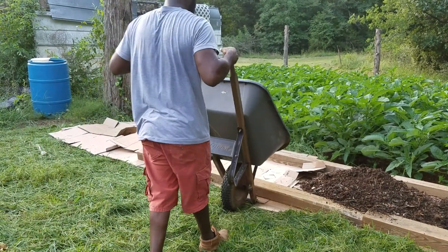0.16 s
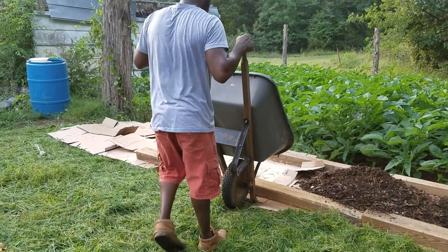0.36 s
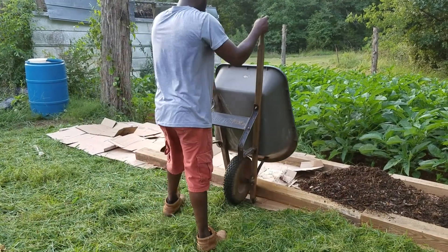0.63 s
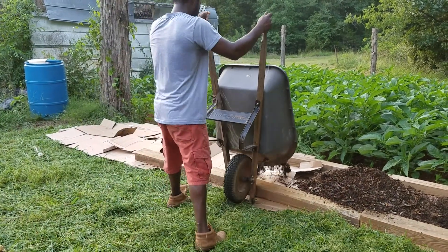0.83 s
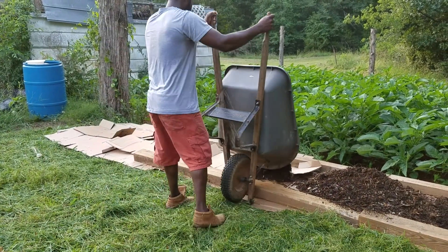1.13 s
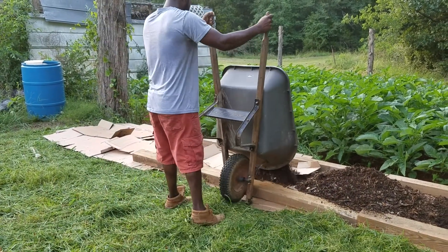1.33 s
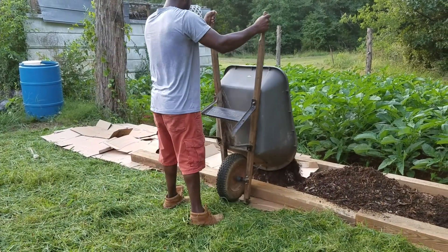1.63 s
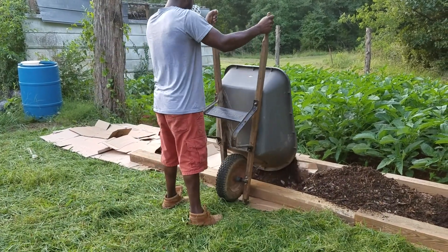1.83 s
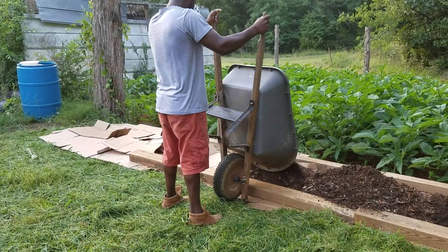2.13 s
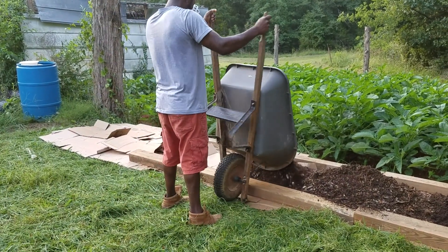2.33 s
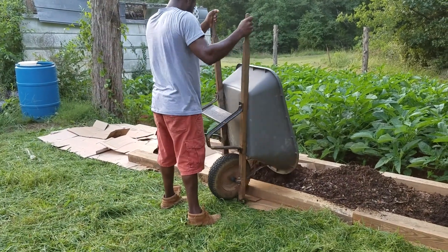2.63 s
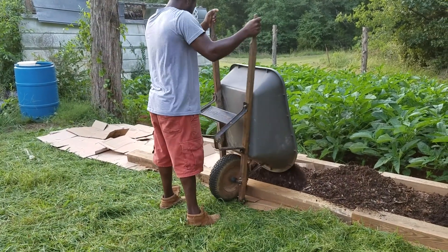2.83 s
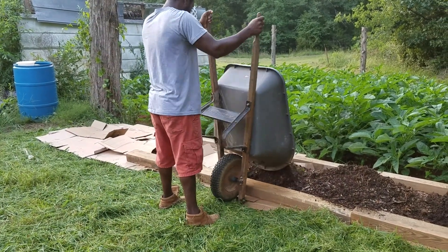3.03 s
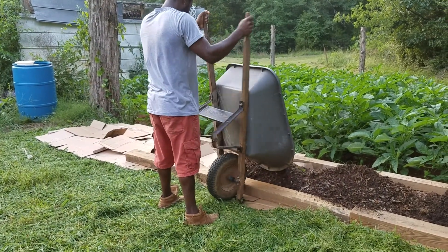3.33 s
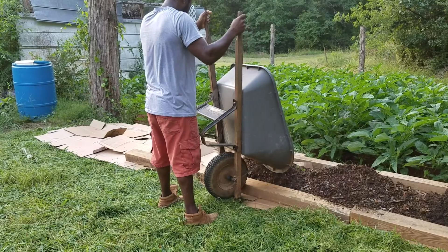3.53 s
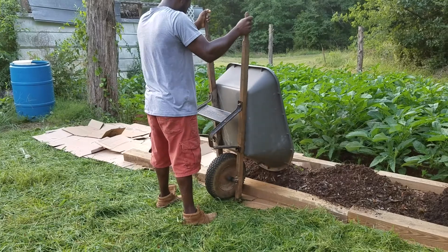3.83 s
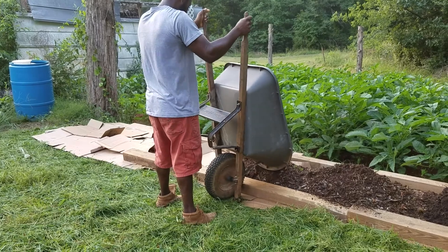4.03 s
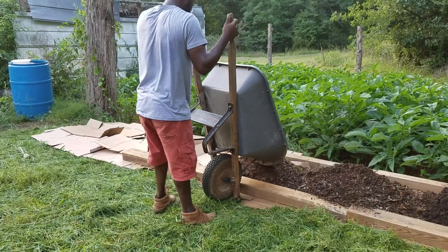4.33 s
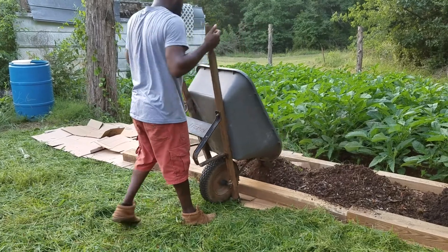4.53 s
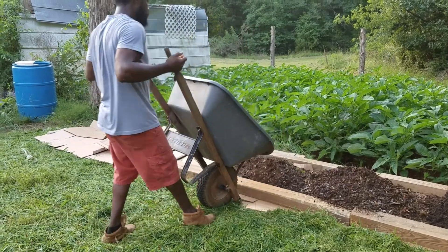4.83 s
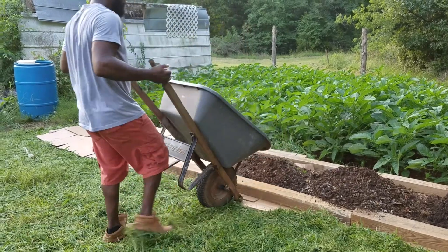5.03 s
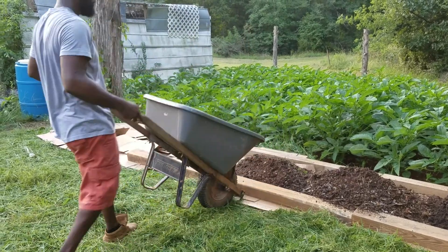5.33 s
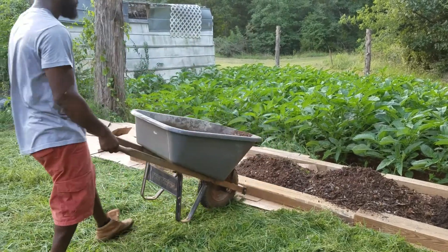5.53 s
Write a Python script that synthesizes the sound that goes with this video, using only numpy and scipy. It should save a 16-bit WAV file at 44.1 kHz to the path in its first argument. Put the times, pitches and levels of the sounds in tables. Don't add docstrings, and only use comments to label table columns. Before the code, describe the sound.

Outdoors, a steel barrow clatters, dumps sliding soil, knocks heavily against timber in uneven blows, then falls quiet to soft steps on grass.

```python
import sys
import numpy as np
from scipy import signal
from scipy.fft import rfft, irfft
from scipy.io import wavfile
from scipy.ndimage import uniform_filter1d

SR = 44100
rng = np.random.default_rng(int(sys.argv[2]) if len(sys.argv) > 2 else 0)


def natural_amplitude(level_db):
    exponent = np.asarray(level_db, float) / 20
    return 10 ** exponent


def master_out(mix):
    frames = np.transpose(np.atleast_2d(mix))
    ceiling = np.clip(frames, -1, 1)
    pcm = np.round(ceiling * 32767).astype(np.int16)
    wavfile.write(sys.argv[1], SR, pcm)


N = 250047

# (frequency [Hz], level [dB], decay by 60 dB [s])
PANEL_MODES = [(134, 0, 0.23), (191.5, -4, 0.11), (285.6, -1, 0.041), (348, -7.5, 0.1),
               (423.7, -5.5, 0.098), (450, -16.5, 0.19), (524.5, -7, 0.093), (682, -11, 0.04)]
# (frequency [Hz], level [dB], decay by 60 dB [s])
FRAME_MODES = [(1000, -13, 0.003), (1060, -8.5, 0.029), (1180, -5.5, 0.033), (1350, -11.5, 0.039),
               (1690, -3, 0.016), (1880, -5.5, 0.029), (2260, 3, 0.0062), (2470, -3, 0.0057),
               (2743, 1, 0.016), (3053, 5, 0.0074), (3500, -1, 0.01), (4290, -3, 0.019),
               (4570, -16, 0.0054)]

EARS = np.array([[1], [-1]])


def unit_rms(x):
    return x / np.sqrt(np.mean(x ** 2))


def band(x, lo_hz, hi_hz, order=2):
    return signal.sosfilt(signal.butter(order, [lo_hz, hi_hz], "band", fs=SR, output="sos"), x)


def walk(rate):
    k = int(SR / rate)
    held = np.repeat(rng.standard_normal(N // k + 1), k)
    return 2.54 * uniform_filter1d(uniform_filter1d(held, k), k)[:N]


def grains(per_s, spread_db):
    draw = rng.random((2, N))
    hit = draw[0] < per_s / SR
    u = 2 * draw[1][hit] - 1
    rarity = np.minimum(-np.log(np.abs(u) + 1e-9), 3)
    out = np.zeros(N)
    out[hit] = np.sign(u) * natural_amplitude(spread_db * rarity)
    return out


def wide(make, likeness):
    c = np.clip(likeness, 0, 1)
    return np.sqrt((1 + c) / 2) * make() + np.sqrt((1 - c) / 2) * make() * EARS


def treble(likeness, top_hz=12160):
    hiss = wide(lambda: np.diff(grains(5000, 2.1), n=2, prepend=[0, 0]), likeness)
    return unit_rms(band(hiss, 4600, top_hz))


def add(out, s, y):
    i = int(s * SR)
    out[..., i:i + y.shape[-1]] += y[..., :N - i]


def to_peak(y, db):
    return y / np.abs(y).max() * natural_amplitude(db)


def swells(table):
    t = np.arange(N) / SR
    return sum(natural_amplitude(db) * np.sin(np.pi * np.clip((t - s) / length, 0, 1)) ** .5 for s, length, db in table)


def ring(modes, scatter_db, click):
    hz, db, t60 = np.transpose(modes)[:, :, None]
    t = np.arange(int(SR * min(t60.max(), .12))) / SR
    chance = rng.standard_normal((4, len(modes), 1))
    phase = 2 * np.pi * hz * (1 + 0.031 * chance[0]) * t
    fade = natural_amplitude(db + scatter_db * chance[1] - 60 * t / t60) * np.sign(chance[2])
    skew = 0.16 * chance[3] * hz / 1000 * np.exp(-hz / 9000)
    both = np.cos(skew.T) @ (fade * np.sin(phase))
    apart = np.sin(skew.T) @ (fade * np.cos(phase))
    out = np.vstack([both + apart, both - apart])
    out[:, 0] += click
    return out


def strike(db, push, modes, click, lo_hz, hi_hz):
    y = signal.fftconvolve(ring(modes, 1.73, click), push[None])[:, :len(push)]
    y = signal.lfilter(*signal.butter(2, [lo_hz, hi_hz], "band", fs=SR), y)
    return to_peak(y, db)


def blows(table, grit_db, debris_db, debris_s, spread):
    # (frequency [Hz], level [dB], decay by 60 dB [s])
    grit_modes = [(5100, 11.5, 0.00089), (7580, -5, 0.0034), (9020, 5.5, 0.0064), (10900, -13, 0.0061)]
    out, t = np.zeros((2, N)), np.arange(SR // 8) / SR
    for s, db, grit, ms, hz in table:
        chance = rng.standard_normal((3, len(t)))
        lumps = np.minimum(uniform_filter1d(chance[2], size=60) * np.sqrt(60), 1.8)
        crumbs = natural_amplitude(debris_db + 6.0 * lumps) * np.exp(-t / debris_s)
        chatter = np.exp(-t / (abs(ms) / 1000 + 1e-4))
        contact = (chatter + crumbs) * (1 - np.exp(-t / 0.00017))
        touch = 3 * np.exp(-np.abs(t - .001) / .00008)
        lo_hz, hi_hz = max(hz / spread, 650), min(hz * spread, 5300)
        modes = FRAME_MODES + [(hz, 3, .016)]
        add(out, s, strike(db, touch + contact * chance[0], modes, 21.0, lo_hz, hi_hz))
        fine = strike(db + grit + grit_db, contact * chance[1], grit_modes, 8.7, 1800, 11000)
        add(out, s, fine * natural_amplitude(.9 * EARS))
    return out


def singing(hits, modes):
    out, t = np.zeros(N), np.arange(SR // 4) / SR
    for s, db in hits:
        lines = sum(natural_amplitude(g - 60 * t / t60) * np.sin(2 * np.pi * hz * t) for hz, g, t60 in modes)
        add(out, s, natural_amplitude(db) * lines)
    return out


def cicadas():
    # (frequency [Hz], width [Hz], rms level [dB], clicks [1/s], left minus right [dB],
    # left-right likeness [0-1])
    choirs = [
        (6630, 440, -56, 650, -4.5, 0),
        (7280, 1300, -57, 1300, 4, 0.8),
        (9430, 810, -59.5, 1300, -6.5, 1),
    ]
    out = 0
    for hz, width, db, per_s, pan_db, likeness in choirs:
        lo_hz, hi_hz = hz - width / 2, hz + width / 2
        choir = wide(lambda: unit_rms(band(grains(per_s, 0.28), lo_hz, hi_hz, order=3)), likeness)
        out = out + choir * natural_amplitude(db + .5 * walk(1.47) + 0.45 * walk(40) + pan_db * .5 * EARS)
    return out


def air():
    # (frequency [Hz], level [dB per Hz])
    hum_spectrum = [(24, -51), (40, -10), (80, -7.5), (156, -54), (238, -7.5), (410, -2.5), (836, -16),
                    (1440, -15), (1980, -17.5), (2390, -17.5), (6000, -18.5), (7800, -50), (13200, -120)]
    # (time [s], level [dB])
    breeze = [
        (0, 0),
        (4.3, -0.5),
        (5.35, 0),
        (5.55, -4),
    ]
    hum_db, hiss_db = -60, -65
    out, swell, (at, db) = 0, walk(0.64), np.transpose(hum_spectrum)
    breeze_db = np.interp(np.arange(N) / SR, *np.transpose(breeze))
    for hz in 45 * 2 ** np.arange(0, 7.5, .5):
        hum = wide(lambda: band(rng.standard_normal(N), hz / 2 ** 0.15, hz * 2 ** 0.27), .95 - hz / 4500)
        level_db = np.interp(np.log(hz), np.log(at), db)
        out = out + hum * natural_amplitude(level_db + .5 * swell + walk(20.54) + breeze_db * (hz < 1200))
    flicker_db = 0.5 * walk(5) + 0.8 * walk(30)
    return unit_rms(out) * natural_amplitude(hum_db) + treble(0.69, 15300) * natural_amplitude(hiss_db + flicker_db)


def load():
    # (time [s], jolting level [dB], flow level [dB])
    motion = [(0.07, -75, -63.5), (0.16, -64, -56.5), (0.45, -59, -50), (0.66, -61, -51.5),
              (0.84, -50.5, -44.5), (1.05, -49.5, -46.5), (1.2, -52.5, -54), (1.74, -47, -51.5),
              (2.2, -46, -53), (2.46, -54, -59), (2.68, -41, -51.5), (2.84, -52.5, -58), (3.13, -48, -53),
              (3.9, -45.5, -50.5), (4.07, -67, -62.5), (4.6, -85, -74), (5.2, -86, -66), (5.67, -88, -77)]
    t = np.arange(N) / SR
    s, *columns = np.transpose(motion)
    jolt_db, flow_db = (np.interp(t, s, c) for c in columns)
    boom_db = -49 + 0.74 * (jolt_db + 50.5)
    dust_db = -51 + 0.53 * (flow_db + 47) - 0.5 * t

    def tumble(modes, per_s, spread_db, click, lo_hz, hi_hz):
        out = 0
        for _ in range(5):
            response = ring(modes, 0.92, click)
            out = out + signal.oaconvolve(response, grains(per_s, spread_db)[None], axes=1)[:, :N]
        return unit_rms(band(out, lo_hz, hi_hz, order=3))

    rumble = unit_rms(band(rng.standard_normal(N), 38.0, 183, order=3))
    rumble = rumble * natural_amplitude(jolt_db - 4.5) * natural_amplitude(1.1 * walk(13.0))
    boom = tumble(PANEL_MODES, 150, 3.0, 36.0, 181.0, 860) * natural_amplitude(boom_db + 1.2 * walk(34))
    damp = [(hz, db - 10 * np.log10(1 + (hz / 1300) ** 2), t60) for hz, db, t60 in FRAME_MODES[:-1]]
    scrape = tumble(damp, 2200, 9.0, 7.0, 520, 5600) * natural_amplitude(flow_db + 1.4 * walk(70))
    dust = treble(.6) * natural_amplitude(dust_db + 1.0 * walk(66) + 0.26 * walk(10.2))
    return rumble + boom + scrape + dust


def ticks():
    # (time [s], peak level [dB], centre frequency [Hz])
    snaps = [(0.0294, -42, 12000), (0.0538, -43, 14200), (0.0867, -33, 15400), (0.1244, -40, 11300),
             (0.1426, -37, 14800), (0.1775, -41, 14500), (0.4184, -36, 10800), (0.4469, -40, 12000),
             (0.4604, -33, 10900), (0.4898, -32, 14600), (0.6395, -33, 15000), (0.7502, -39, 15200),
             (3.3846, -25, 11300), (3.484, -28, 14600), (3.6303, -22, 14500), (3.836, -24, 13900),
             (4.2133, -46, 14200), (5.0938, -47, 11900), (5.229, -40, 15100), (5.3118, -39, 14700),
             (5.3672, -34, 11200), (5.5139, -45, 15100), (5.61, -42, 15200)]
    out, t = np.zeros((2, N)), np.arange(SR // 50) / SR
    for s, db, hz in snaps:
        mid, side = rng.standard_normal((2, len(t))) * np.exp(-t / 0.002)
        y = band(mid + 0.56 * side * EARS, hz / 1.8, min(hz * 1.4, 17000), order=1)
        add(out, s, to_peak(y, db + 1.0))
    return out


def lurches():
    # (time [s], peak level [dB], centre frequency [Hz])
    lurch_table = [(0.044, -53, 72.7), (0.194, -53, 143), (0.249, -51, 94.2), (0.319, -55, 80.7),
                   (0.48, -41.5, 144), (0.599, -60, 148), (0.68, -53.5, 127), (0.759, -43, 146),
                   (0.809, -46, 143), (0.991, -45.5, 148), (1.133, -46, 148), (1.182, -35.5, 116),
                   (1.247, -48, 121), (1.382, -47, 148), (1.433, -36, 88), (1.575, -41, 120),
                   (1.677, -29, 134), (1.73, -42, 88.8), (1.851, -40, 148), (1.911, -39.5, 103),
                   (2.059, -42, 132), (2.132, -31, 149), (2.19, -47, 88.8), (2.226, -43, 145),
                   (2.288, -45, 88.8), (2.346, -42, 148), (2.437, -47, 130), (2.51, -47, 95),
                   (2.595, -44, 121), (2.648, -41, 135), (2.719, -34.5, 116), (2.8, -48, 80.7),
                   (2.897, -31, 131), (2.95, -27, 148), (3.022, -29.5, 129), (3.08, -61, 121),
                   (3.175, -39.5, 146), (3.272, -34, 130), (3.361, -33.5, 121), (3.487, -39.5, 121),
                   (3.615, -32.5, 110), (3.709, -47, 145), (3.809, -51, 138), (3.913, -43, 96.9),
                   (3.979, -51, 146)]
    attack_s, decay_s = 0.0051, 0.035
    out, t = np.zeros(N), np.arange(SR // 4) / SR
    envelope = (1 - np.exp(-t / attack_s)) * np.exp(-t / decay_s)
    for s, db, hz in lurch_table:
        y = band(rng.standard_normal(len(t)), hz / 1.5, hz * 1.29) * envelope
        add(out, s, to_peak(y, db + 2.0))
    return out


def clods():
    # (time [s], clank peak level [dB], clank centre frequency [Hz])
    clod_table = [(0.086, -48, 1940), (0.165, -29, 2610), (0.6848, -26, 1200), (0.738, -29, 1310),
                  (0.7721, -28, 1250), (0.8569, -31.5, 1150), (0.924, -31, 1490), (0.973, -38, 1010),
                  (1.037, -31.5, 1050), (1.312, -33.5, 3600), (1.495, -39, 1280), (1.527, -40, 1820),
                  (1.5443, -36, 1680), (1.595, -41, 1260), (1.7385, -42, 1330), (1.809, -34, 1180),
                  (1.9076, -32, 1630), (1.9807, -39, 1230), (2.29, -38, 1920), (2.3805, -56, 1180),
                  (2.541, -48, 1090), (2.5616, -34.5, 2780), (2.588, -35, 2470), (2.6544, -31, 1700),
                  (2.8275, -37.5, 1000), (3.106, -41, 1070), (3.3618, -47, 1060), (4.6803, -68, 1040),
                  (4.76, -59, 1840), (4.869, -49, 3040), (5.117, -52, 2010), (5.229, -48, 2030),
                  (5.5633, -60, 937)]
    return blows([(s, db, -15, 2.5, hz) for s, db, hz in clod_table], 0.1, -13, 0.013, 2.36)


def rattles():
    # (time [s], clank peak level [dB], clank centre frequency [Hz])
    rolling = [(0.128, -47, 1000), (0.141, -29.5, 920), (0.178, -28, 2580), (0.214, -30, 1950),
               (0.24, -27, 1060), (0.272, -25, 2420), (0.287, -35, 1220), (0.296, -27, 1240),
               (0.314, -22.5, 2750), (0.346, -31, 1150), (0.371, -29, 1950), (0.421, -34, 1830),
               (0.443, -31, 3000), (0.468, -28.5, 1880), (0.489, -14.5, 1720), (0.507, -28, 1180),
               (0.533, -17, 1230), (0.54, -29, 1760), (0.577, -39, 1230), (0.588, -25, 1110),
               (0.597, -31, 1160), (0.64, -29.5, 1180), (0.696, -38, 1180)]
    # (time [s], clank peak level [dB], clank centre frequency [Hz])
    tipping = [(0.752, -23.5, 1510), (0.762, -29, 2400), (0.796, -22, 1230), (0.804, -26, 1070),
               (0.814, -21, 1060), (0.825, -25, 1740), (0.8302, -25, 2200), (0.834, -26, 1400),
               (0.839, -24, 1000), (0.847, -30, 1690), (0.884, -21, 1660), (0.901, -21, 1130),
               (0.989, -28.5, 1040), (0.999, -29, 1190), (1.018, -29, 1060), (1.044, -31, 1010),
               (1.093, -31, 1390)]
    table = [(s, db, -23, 1.03, hz) for s, db, hz in rolling + tipping]
    return blows(table, 2.0, -20, 0.038, 1.9)


def thumps():
    # (time [s], peak level [dB], centre frequency
    # [Hz])
    full = [(0.135, -57, 457), (0.289, -40, 390), (0.485, -27, 229), (0.531, -39, 408), (0.593, -40, 332),
            (0.7703, -25.5, 365), (0.885, -31.5, 350), (0.987, -31, 318), (1.019, -33, 287),
            (1.065, -38, 347), (1.199, -22.5, 540), (1.364, -31, 352), (1.396, -24, 323),
            (1.434, -24.5, 523), (1.546, -34.5, 215), (1.62, -23, 298), (1.675, -21.5, 540),
            (1.691, -30, 153), (1.86, -20, 464), (1.868, -24, 260), (1.92, -26, 450), (2.053, -26.5, 273),
            (2.137, -16.5, 209), (2.158, -27, 165), (2.183, -33, 525), (2.271, -34, 201),
            (2.353, -29.5, 310),
            (2.602, -27, 485), (2.617, -24, 313), (2.706, -31.5, 406), (2.876, -23, 210),
                (2.901, -28, 340), (2.921, -30, 184), (2.959, -16, 330), (2.973, -25.5, 415),
                (2.988, -24, 182), (3.189, -22.5, 232), (3.275, -26.5, 580), (3.383, -36.5, 139),
                (3.392, -26, 351), (3.414, -28, 167), (3.483, -21, 487), (3.501, -24.5, 433),
                (3.528, -27, 334), (3.613, -17.5, 434), (3.631, -27, 415), (3.707, -23.5, 540),
                (3.72, -23, 356), (3.814, -20, 450), (3.837, -32, 460), (3.893, -20.5, 533),
                (3.91, -24, 575), (3.98, -26.5, 364), (4.004, -33.5, 580)]
    # (time [s], peak level [dB], centre frequency [Hz])
    steps = [
        (4.184, -50, 437),
        (4.521, -50, 400),
        (4.709, -45, 417),
        (4.868, -48, 470),
        (5.119, -54, 497),
        (5.367, -43.5, 427),
    ]
    db_per_octave = 4.5
    out, t = np.zeros((2, N)), np.arange(SR // 7) / SR
    for s, db, hz in full + steps:
        push = np.exp(-t / 0.00018) + 0.14 * rng.standard_normal(len(t)) * np.exp(-t / 0.0031)
        near = [(f, g - db_per_octave * abs(np.log2(f / hz)), t60) for f, g, t60 in PANEL_MODES[1:]]
        add(out, s + 0.00197, strike(db, push, near + [(hz, 5, .038)], 38.0, hz / 2.3, hz * 2.4))
    return out


def puffs():
    # (start time [s], length [s], rms level [dB])
    puff_table = [
        (0.3, 0.28, -58),
        (0.788, 0.094, -45),
        (0.87, 0.091, -58),
        (1.68, 0.1, -55),
        (3.503, 0.33, -64),
        (4.86, 0.16, -59),
        (5.08, 0.05, -61),
    ]
    hiss = unit_rms(band(treble(0.96), 7500, 22000, order=1))
    return hiss * swells(puff_table) * natural_amplitude(1.1 * walk(70))


def rushes():
    # (start time [s], length [s], rms level [dB])
    rush_table = [(0.818, 0.055, -39.5), (0.88, 0.063, -43.5), (0.985, 0.05, -46), (1.43, 0.04, -50),
                  (1.68, 0.062, -54), (1.87, 0.024, -56), (2.5, 0.1, -54), (2.63, 0.097, -50.5),
                  (3.08, 0.11, -58), (4.84, 0.17, -63), (5.03, 0.13, -64), (5.24, 0.19, -60)]
    dull = [(hz, db - 10 * np.log10(1 + (hz / 1800) ** 2), 0.55 * t60) for hz, db, t60 in FRAME_MODES]
    grit = 0
    for _ in range(4):
        grit = grit + signal.oaconvolve(ring(dull, 1.8, 4.8), grains(320, 6.0)[None], axes=1)[:, :N]
    return unit_rms(band(grit, 950, 4000)) * swells(rush_table) * natural_amplitude(1.1 * walk(120))


def knocks():
    # (time [s], clank peak level [dB], grit relative level [dB], contact [ms],
    # clank centre frequency [Hz])
    rocking = [(1.195, -18.5, -6, 7, 2260), (1.202, -26, -21, 2.3, 2100), (1.397, -37, -13, 4, 1180),
               (1.418, -24, -10, 4, 2590), (1.432, -21, -12, 8.1, 2200), (1.6215, -22, -30, 1.5, 1300),
               (1.669, -18.5, -12, 8, 2100), (1.679, -21, -12, 8, 2600), (1.689, -29, 4, 2, 1790),
               (1.8575, -18, -20, 2.1, 1140), (1.864, -14, -19, 6.1, 1380), (1.882, -35.5, 5, 3.9, 880),
               (1.923, -26.5, -30, 6.9, 2400), (2.054, -22.5, 0.5, 1.9, 1900), (2.125, -34, -26, 4.4, 2740),
               (2.139, -13.5, -17, 4, 1180), (2.157, -14.5, -10.5, 5.1, 1430), (2.182, -32, -23, 3.5, 1070),
               (2.221, -31, -15, 1.3, 1060), (2.355, -22, -11, 1.5, 1660)]
    heaving = [(2.6, -21.5, -17, 10.5, 2790), (2.622, -29, 0, 11, 1170), (2.693, -38, -19, 2.3, 1270),
               (2.712, -22.5, -8, 2, 1920), (2.877, -31, -16, 8.6, 1200), (2.894, -22.5, -10, 14, 1350),
               (2.915, -20, -9, 2.9, 1410), (2.962, -14, -4, 2.3, 2970), (2.989, -23.5, -24, 1.1, 1230),
               (3.191, -20.5, -13, 1.6, 1470), (3.274, -24, -34, 6.1, 2300)]
    shaking = [(3.386, -35, 2, 4.4, 2260), (3.394, -16, 1.5, 4.3, 3150), (3.479, -17, -18, 4.1, 3320),
               (3.485, -34.5, 14, 4, 1800), (3.492, -18, -6, 6.5, 2530), (3.528, -20, 6, 3.3, 1350),
               (3.611, -24, 7.5, 4.1, 1590), (3.628, -27, 8.5, 6.8, 1080), (3.707, -13, -1, 9.2, 3220),
               (3.719, -16.5, -2, 7, 2260), (3.816, -15.5, 4.5, 3.7, 3400), (3.835, -32, 8, 2.8, 1240),
               (3.89, -13, -10, 6.7, 3220), (3.896, -16.5, -2, 5.3, 1620), (3.904, -21.5, -1, 10, 1070),
               (3.984, -23, -3, 4.7, 1390)]
    return blows(rocking + heaving + shaking, 0.27, -25.5, 0.028, 2.93)


def brace():
    # (time [s], peak level [dB])
    brace_hits = [
        (1.195, -50),
        (1.43, -56),
        (1.672, -45.5),
        (2.139, -56),
    ]
    # (frequency [Hz], level [dB], decay by 60 dB [s])
    brace_modes = [(4260, 0, 0.29), (4350, -9, 0.13), (1200, -4, 0.25), (1680, -13, 0.1)]
    return singing(brace_hits, brace_modes)


def shimmer():
    # (time [s], peak level [dB])
    bright_hits = [(3.395, -46), (3.528, -38), (3.63, -44), (3.708, -42), (3.816, -40), (3.898, -43)]
    # (frequency [Hz], level [dB], decay by 60 dB [s])
    sheet_modes = [(8950, 0, 0.09), (9280, -3, 0.07), (11280, -3, 0.09), (7400, -6, 0.06)]
    return singing(bright_hits, sheet_modes)


def scuffs():
    # (time [s], clank peak level [dB], grit relative level [dB], contact [ms],
    # clank centre frequency [Hz])
    scuff_table = [
        (4.18, -37, -24, 3, 2950),
        (4.213, -40, -13, 7, 2260),
        (5.286, -45, 3, 19, 1170),
        (5.312, -47, 9, 6, 1150),
        (5.333, -51, -8, 19, 1600),
        (5.362, -33.5, -5, 1.6, 1720),
    ]
    return blows(scuff_table, -0.5, -14.0, 0.021, 2.5)


def scattered(source):
    t = np.arange(SR // 5) / SR
    tail = band(rng.standard_normal((2, len(t))), 235, 6200, order=1) * natural_amplitude(-60 * t / 0.12) * (t > .001)
    return signal.fftconvolve(source.mean(0)[None], tail, axes=1)[:, :N]


def diffract(source):
    lows = signal.filtfilt(*signal.butter(2, 6000, fs=SR), source[0])
    source[0] += np.roll(lows, 1) - lows
    return source


def scene():
    barrow = rattles() + knocks() + scuffs() + thumps() + load()
    wet = scattered(barrow)
    barrow = barrow + clods() + lurches() + brace() + shimmer() + rushes()
    direct = diffract(barrow) * natural_amplitude(.1 * EARS)
    garden = cicadas() + air()
    return direct + natural_amplitude(-35.0) * wet + garden + ticks() + puffs()


def band_limit(x):
    return signal.sosfilt(signal.butter(12, 16810, fs=SR, output="sos"), x)


def record(dry):
    right = signal.sosfilt(signal.butter(1, 130, "high", fs=SR, output="sos"), dry[1])
    x = np.array([dry[0], right * natural_amplitude(-0.25)])
    x = signal.sosfilt(signal.butter(1, 45, "high", fs=SR, output="sos"), x)
    hz = np.fft.rfftfreq(N, 1 / SR)
    capsule_db = 7.5 * np.exp(-((hz - 15000) / 760) ** 2)
    top_gain = np.where(hz > 15900, natural_amplitude(-26), 1)
    x = irfft(rfft(x) * natural_amplitude(capsule_db) * top_gain, N) - .0006
    return band_limit(x)


dry = scene()
out = record(dry)
master_out(out)
```